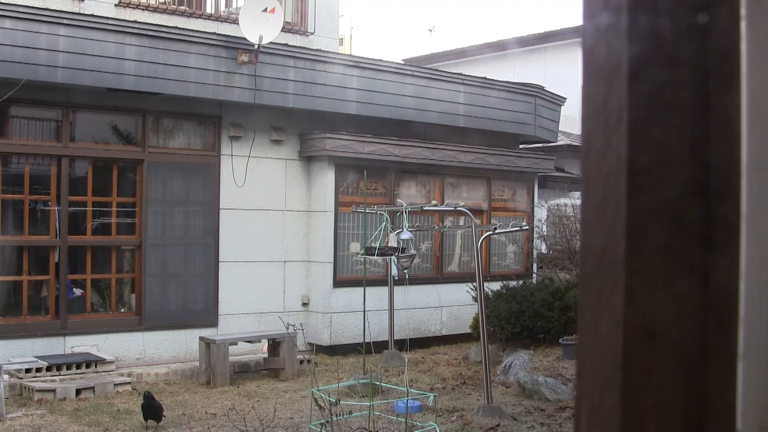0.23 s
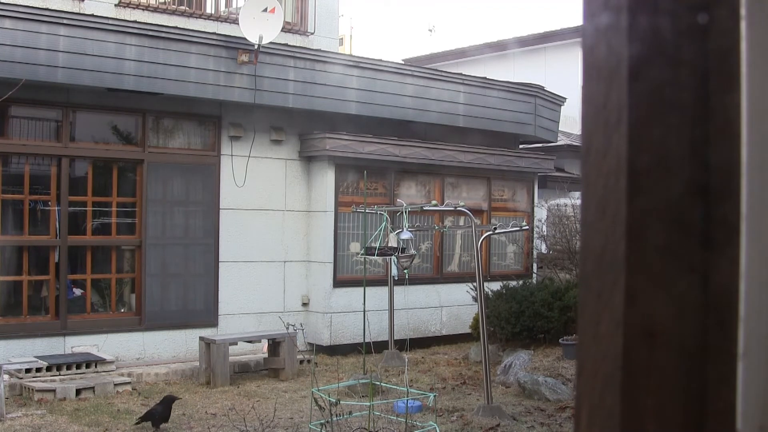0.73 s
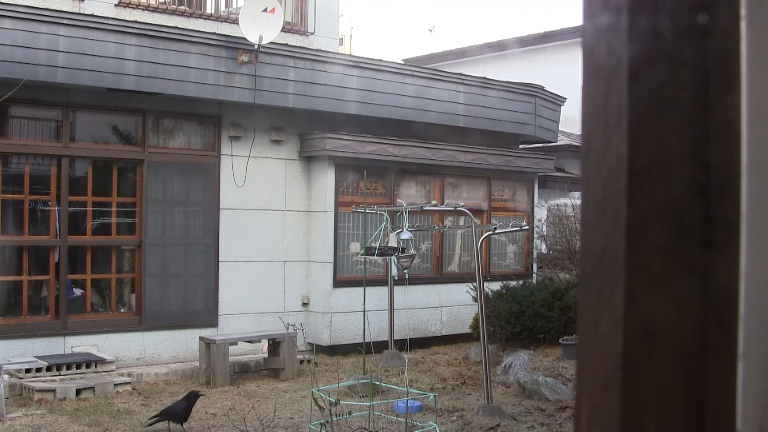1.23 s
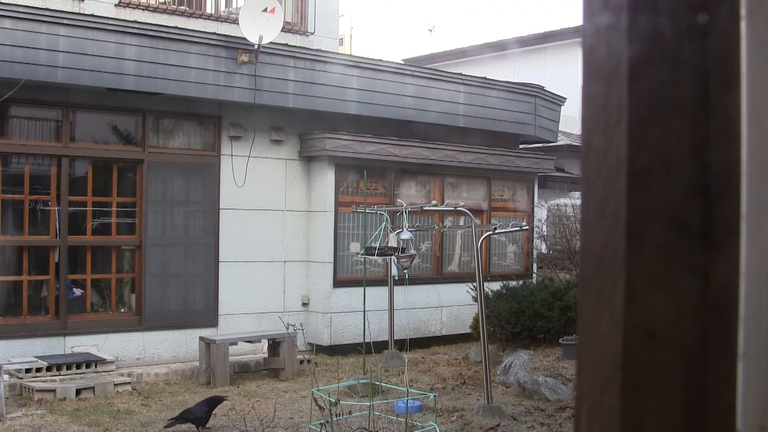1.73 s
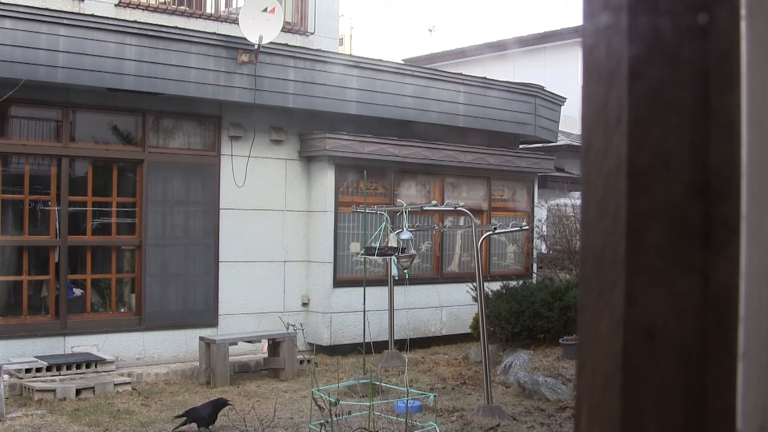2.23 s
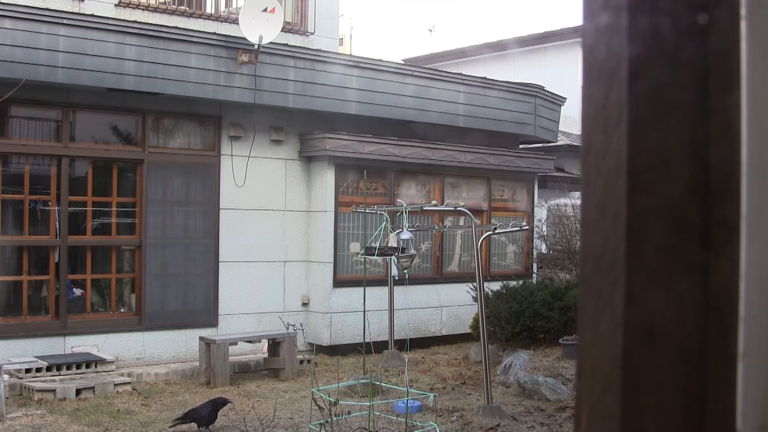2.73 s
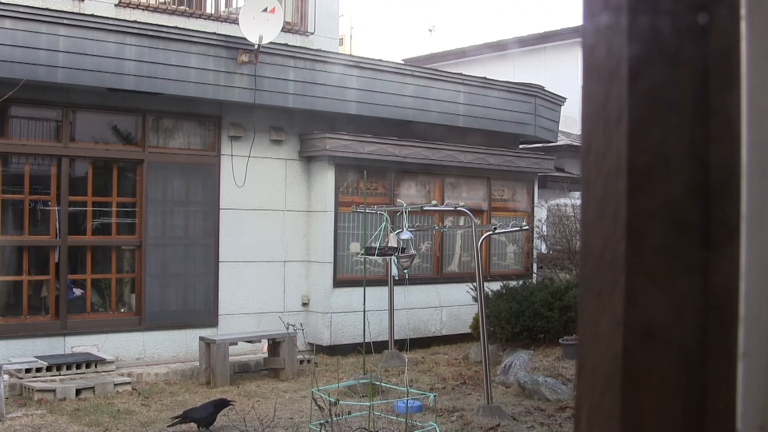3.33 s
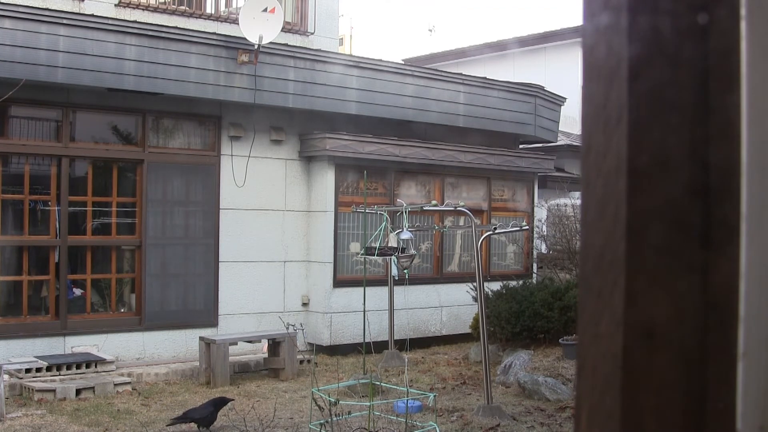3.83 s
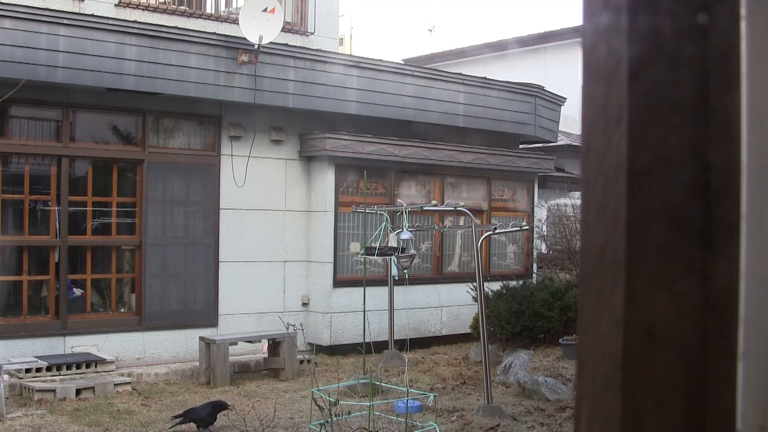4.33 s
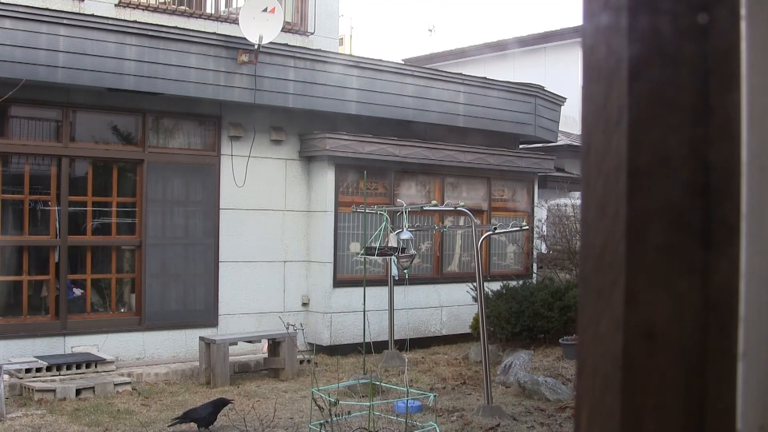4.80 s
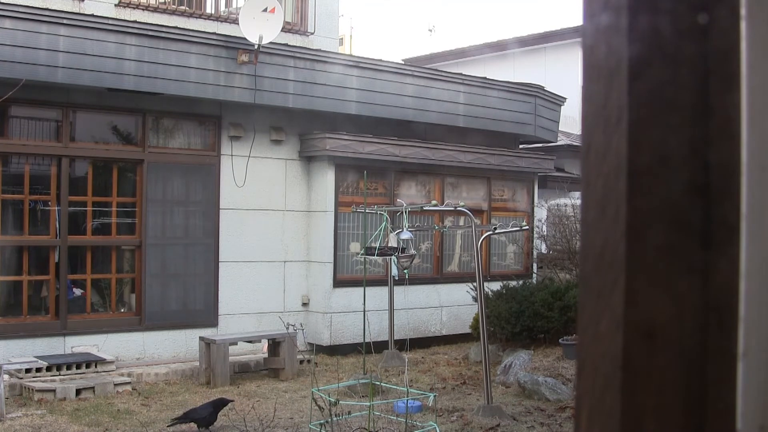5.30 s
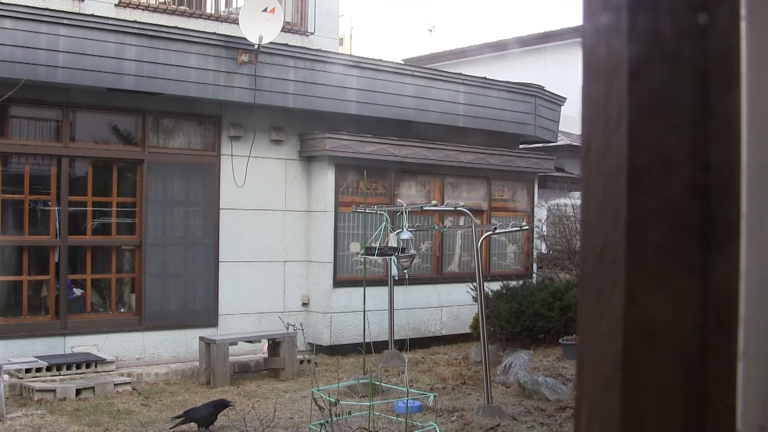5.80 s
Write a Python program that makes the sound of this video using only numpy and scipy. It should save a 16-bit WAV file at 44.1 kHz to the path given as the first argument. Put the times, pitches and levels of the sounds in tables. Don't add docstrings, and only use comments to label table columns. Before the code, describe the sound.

For the first 1.3 seconds there is only a soft, wide town hum with very faint, wavering machine tones. Then a crow, some metres off and slightly left of centre, gives a loud, rattling caw from 1.3 to 1.9 s, starting softly and sinking in pitch. A firmer, less rough one follows at 2.2-2.9 s, a weaker one at 3.2-4.0 s, a longer, smoother one at 4.5-5.2 s, and a short, brighter, raspy one at 5.8-6.2 s. Each opens duller, then turns harsh and nasal, stops quickly and leaves a short echo from the porch and house walls. A far vehicle's low drone grows slowly until about 4.6 s; another rises faster to 5.9 s. Cloth swishes softly near the microphone at 4.2-4.6 s and more faintly at 5.2-5.5 s.

```python
import sys
import numpy as np
from scipy import signal
from scipy.fft import rfft, irfft
from scipy.io import wavfile
from scipy.ndimage import uniform_filter1d

SR = 44100
rng = np.random.default_rng(int(sys.argv[2]) if len(sys.argv) > 2 else 0)


def boost(x):
    u = np.asarray(x, float) / 20
    return 10 ** u


def to_wav(sig):
    pcm = np.clip(np.atleast_2d(sig), -1, 1) * 32767
    pcm = np.round(pcm).astype(np.int16)
    wavfile.write(sys.argv[1], SR, pcm.T)


N = 267113

# (voice starts [s], release starts [s], level [dB], first breath re level [dB], attack [s])
CAWS = [
    (1.305, 1.843, -13.5, -27, 0.09),
    (2.213, 2.83, -13.5, -15, 0.11),
    (3.232, 3.914, -17.5, -24.5, 0.081),
    (4.463, 5.160, -14, -17, 0.068),
    (5.77, 6.151, -15, -15.5, 0.098),
]
# (roughness on a held step [0-1], second membrane [0-1], chest [dB], beak [dB], rasp [dB])
VOICES = [
    (.4, 0.54, -30, -18, -21.5),
    (.3, 0.61, -30.5, -15, -19.5),
    (.4, 0.82, -30, -17.5, -22.5),
    (0.21, 0.68, -30, -17, -20.5),
    (0.29, 0.76, -30, -13, -17.5),
]
BRIGHT_DB = [-0.5, 0, -1.5, -1.5, 1]
# (slip starts [s], length [s], new beat [Hz], roughness added [0-1])
SLIPS = [(1.203, .05, 96.14, 0.03), (1.311, .1, 90.98, 0.08), (1.50, .09, 82.66, 0.36),
         (1.731, .12, 71.87, 0.17), (2.051, .05, 90.3, 0.02), (2.32, .1, 82.77, 0.24),
         (2.76, .06, 75.66, 0.18), (3.052, .05, 98.85, 0.08), (3.239, .21, 81.88, 0.33),
         (3.752, .2, 73.94, 0.15), (4.249, .05, 91.8, 0), (4.58, 0.0575, 89.8, 0), (4.81, .07, 81.83, 0.35),
         (4.963, .18, 74, 0.04), (5.55, .05, 95.6, 0.05), (5.83, 0.065, 89.55, 0.43),
         (5.93, 0.086, 84.44, 0.11)]
# (frequency [Hz], density [dB per Hz])
THROAT = [(200, -27.5), (330, -37), (530, -23), (800, -26.5), (1000, -9.5), (1200, -4.5), (1850, -3),
          (2120, -18.5), (2700, -13.5), (3350, -36.5), (4700, -37), (5700, -32.5), (7800, -47.5),
          (12000, -64.5)]
# (frequency [Hz], width [Hz], boost [dB])
DOORWAY = [(297, 38, 7.5), (548, 18, 11), (885.5, 17, 7.5), (1004, 21, 6.5), (1159.5, 29, 12),
           (1386.4, 47, 7), (1507, 68, 7.5), (1750, 32, 6), (1876, 57, 4), (2239, 110, 6.5)]
# (frequency [Hz], width [Hz], boost [dB])
OPENING = [(2803, 380, 12), (4260, 220, 8.5), (5170, 190, 12.5)]
# (frequency [Hz], width [Hz], boost [dB])
GAPING = [(2585, 205, 10.4), (3750, 90, 7.9), (4110, 170, 4.2), (4400, 87, 4), (5240, 160, 5),
          (5500, 44, 7.1), (6140, 170, 5.6), (6820, 130, 5.7), (8600, 790, 4.2)]
SPLIT_HZ = (790, 2120, 3300)
# (frequency [Hz], t60 [s], level [dB])
YARD = [(500, 0.37, 6), (1570, 0.6, -2), (2660, 0.53, 1), (5960, .45, 6.5)]
# (frequency [Hz], level [dB])
ECHO_SIDE = [(500, -10), (1500, -1), (5000, 3)]
# (frequency [Hz], density [dB per Hz])
CLOTH = [(120, -14), (300, 1), (600, -8.5), (1200, -5), (2500, -10), (5000, -13), (9000, -21.5),
         (13000, -27.5), (15500, -32)]
# (stroke starts [s], fastest [s], ends [s], treble at the fastest [dB])
SWISHES = [
    (4.225, 4.383, 4.6, -57.5),
    (5.212, 5.41, 5.53, -61),
]
# (heard from [s], nearest [s], level there [dB], growth [dB per s])
RUMBLE = [
    (1.988, 4.636, -55.5, 5.5),
    (4.7, 5.856, -53, 13),
]
# (frequency [Hz], density [dB per Hz])
TOWN = [(25, -36), (50, -9.5), (80, -6.5), (180, -1.5), (300, -1), (500, -2), (1000, -7), (1600, -7.5),
        (2800, -14), (5000, -15), (8000, -22.5), (12000, -23.5), (15500, -37)]
# (frequency [Hz], side minus mid [dB])
TOWN_SIDE = [(40, -22.5), (100, -16), (250, -2), (600, -2), (1500, -8), (4000, -3), (14000, -9.5)]
# (frequency [Hz], level [dB])
TONES = [(91.5, -70.5), (183.0, -64.5), (301.5, -65.5), (344.5, -72), (882.9, -70.5), (1012, -67),
         (1254, -70.5), (2062, -76), (2885, -69)]

LEAD_S, LEAD_DB = 0.0074, -20
SAG_FROM, SAG_DB = 0.71, -1.5
RELEASE_S, RELEASE_DB = 0.075, -15
WAVER_DB, WAVER_PER_S = 0.7, 16
GAPE_S = 0.12
TIRES_S, TIRED_SECOND = 0.15, 0.34
CHEST_START_DB, CHEST_START_S, CHEST_END_DB = 14.5, 0.074, 7.5
BEAK_START_DB, BEAK_START_S, BEAK_END_DB = -13.5, 0.029, 3.5
RASP_FALL_DB, RASP_END_DB = -4.5, -1
MOUTH_WAVER_DB = 2
BRIGHT_START_DB, BRIGHT_START_S, BRIGHT_FALL_DB = -7.5, 0.063, -0.5
TILT_HZ = 1460
PORCH_T60_S, PORCH_DB = 0.16, -0.5
YARD_LIKENESS, FIRST_ECHO_S = 0.86, 0.016
CLOTH_DB, SWISH_START_DB, SWISH_END_DB = 16.5, -9, -6.5
RUMBLE_FADE_S = 0.08
TOWN_DB = -50.3


def crow():
    which, since, gone, tired = progress()
    calm, second, chest_db, beak_db, rasp_db = np.array(VOICES)[which].T
    beat_hz, stir = slips()
    rough = np.clip(calm + stir, 0, 1)
    second = np.clip(second * (1 - (1 - TIRED_SECOND) * tired), 0, 1)
    pulses, air = syrinx(beat_hz, rough, second)
    voiced = tract(pulses + 0.8 * rough * air, since)
    breathy = tract(0.23 * pulses + air, since)

    chest_hz, beak_hz, rasp_hz = SPLIT_HZ
    voice = level(band(voiced, chest_hz, beak_hz, order=4), 0)
    chest = level(band(voiced, 200, chest_hz, order=4), 0)
    beak = level(band(voiced, beak_hz, rasp_hz, order=4), 0)
    rasp = level(band(breathy, rasp_hz, 13000, order=4), 0)

    bright_db = np.array(BRIGHT_DB)[which] + BRIGHT_START_DB * np.exp(-since / BRIGHT_START_S)
    voice = tilt(voice, bright_db + BRIGHT_FALL_DB * (gone - .5))
    chest_db = chest_db + CHEST_START_DB * np.exp(-since / CHEST_START_S) + CHEST_END_DB * tired
    beak_db = beak_db + BEAK_START_DB * np.exp(-since / BEAK_START_S) + BEAK_END_DB * tired
    beak_db = beak_db + MOUTH_WAVER_DB * walk(18)
    rasp_db = rasp_db + RASP_FALL_DB * (gone - .5) + RASP_END_DB * tired
    mixed = voice + boost(chest_db) * chest + boost(beak_db) * beak + boost(rasp_db) * rasp
    return effort() * boost(-4.0) * mixed


def syrinx(beat_hz, rough, second):
    beat = np.cumsum(beat_hz * (1 + 0.01193 * rough * walk(60))) / SR
    left = 4 * beat + 0.11 * rough * walk(300)
    right = 5 * beat + 0.092 * rough * walk(300) + 0.32 * rough * walk(25)
    a, b = 2 * np.pi * left, 2 * np.pi * right
    low_strength = (1 + 0.66 * second * np.cos(b)) * boost(4.25 * rough * walk(350))
    high_strength = 0.7 * second * (1 + 0.27 * np.cos(a)) * boost(2.6 * rough * walk(350))
    low = closures(left + 0.089 * second * np.sin(b), low_strength)
    high = closures(right + 0.067 * np.sin(a), high_strength)
    air = rng.standard_normal(N) * (1.3 + np.cos(a)) * (1.5 + second * np.cos(b))
    return level(low + high, 0), level(air, 0)


def closures(turns, strength):
    at = np.flatnonzero(np.diff(np.floor(np.maximum.accumulate(turns))) > 0)
    part = np.clip((np.ceil(turns[at]) - turns[at]) / (turns[at + 1] - turns[at] + 1e-9), 0, 1)
    out = np.zeros(N)
    out[at] += strength[at] * (1 - part)
    out[at + 1] += strength[at] * part
    return out


def slips():
    at, length, hz, extra = np.array(SLIPS).T
    times = np.c_[at, at + length].ravel()
    before = np.r_[hz[0], hz[:-1]]
    beat_hz = ramp(times, np.c_[before, hz].ravel())
    stir = sum(ramp([a - l / 2, a + l / 2, a + 1.59 * l], [0, e, 0]) for a, l, e in zip(at, length, extra))
    return beat_hz, stir


def tract(x, since):
    shut = np.exp(-(since / GAPE_S) ** 2)
    opening = colour(x, THROAT, DOORWAY + OPENING)
    gaping = colour(x, THROAT, DOORWAY + GAPING)
    return shut * opening + (1 - shut) * gaping


def tilt(x, bright_db):
    lowpass = signal.butter(1, TILT_HZ, fs=SR, output="sos")
    lower = signal.sosfilt(lowpass, x)
    lower = signal.sosfilt(lowpass, lower[::-1])[::-1]
    return boost(-bright_db) * lower + boost(bright_db) * (x - lower)


def progress():
    t, rows = np.arange(N) / SR, np.array(CAWS)
    which = np.clip(np.searchsorted(rows[:, 0] - .1, t) - 1, 0, None)
    start, end = rows[which, 0], rows[which, 1]
    gone = np.clip((t - start) / (end - start), 0, 1)
    tired = np.clip(1 + (t - end) / TIRES_S, 0, 1)
    return which, np.maximum(t - start, 0), gone, tired


def effort():
    total = 0
    for start, end, db, first, attack in CAWS:
        sag = start + SAG_FROM * (end - start)
        times = [start - LEAD_S, start, start + attack, sag, end, end + RELEASE_S]
        levels = [first + LEAD_DB, first, 0, 0, SAG_DB, SAG_DB + RELEASE_DB]
        total = total + boost(db + ramp(times, levels, silent=-200))
    return uniform_filter1d(total, size=60) * boost(WAVER_DB * walk(WAVER_PER_S))


def porch(x):
    t = np.arange(SR // 4) / SR
    mid, side = rng.standard_normal((2, len(t))) * np.exp(-np.log(1000) * t / PORCH_T60_S)
    echoes = spread(mid, boost(-10.5) * colour(side, ECHO_SIDE)) / np.sqrt(np.sum(mid ** 2))
    return signal.fftconvolve(x[None], boost(PORCH_DB) * echoes, axes=1)[:, :N]


def yard(x):
    t = np.arange(SR) / SR
    shared, own = rng.standard_normal((2, SR))
    opposite = colour(own, ECHO_SIDE) * np.array([[1], [-1]])
    noise = np.sqrt(1 + YARD_LIKENESS) * shared + np.sqrt(1 - YARD_LIKENESS) * opposite
    edges = [100] + [np.sqrt(a[0] * b[0]) for a, b in zip(YARD, YARD[1:])] + [14000]
    tail = 0
    for (_, t60, db), lo, hi in zip(YARD, edges, edges[1:]):
        fade = np.exp(-np.log(1000) * t / t60) * np.clip(t / FIRST_ECHO_S - .5, 0, 1)
        tail = tail + boost(db) * band(noise, lo, hi) * fade / np.sqrt(2 * np.sum(fade ** 2))
    return signal.fftconvolve(x[None], tail, axes=1)[:, :N]


def cloth():
    mid, side = (level(colour(x * boost(1.2 * walk(90)), CLOTH), 0) for x in rng.standard_normal((2, N)))
    stroke = 0
    for start, top, end, db in SWISHES:
        shape = ramp([start, top, end], [SWISH_START_DB, 0, SWISH_END_DB], silent=-200)
        stroke = stroke + boost(db + shape)
    return boost(CLOTH_DB) * uniform_filter1d(stroke, size=2000) * spread(mid, boost(-10.0) * side)


def rumble():
    mid, side = (level(x, 0) for x in band(rng.standard_normal((2, N)), 81, 430, order=3))
    near = 0
    for start, top, db, grow in RUMBLE:
        levels = [db - grow * (top - start), db, db - 7]
        near = near + boost(ramp([start, top, top + RUMBLE_FADE_S], levels, silent=-200))
    return near * boost(2 + 3.7 * walk(10)) * spread(mid, boost(-16.5) * side)


def town():
    hum, swell = 0, walk(0.27)
    for hz in 24 * 2 ** np.arange(0, 9.6, .5):
        mid, side = band(rng.standard_normal((2, N)), hz / 2 ** .25, hz * 2 ** .25, order=1)
        db = on_log(TOWN, hz) + .5 * swell + .8 * walk(5.6)
        hum = hum + boost(db) * spread(mid, side * boost(on_log(TOWN_SIDE, hz)))
    t, tones = np.arange(N) / SR, 0
    for hz, db in TONES:
        loudness = boost(db + 2.5 + 2.0 * walk(3.18))
        tones = tones + loudness * np.sin(2 * np.pi * hz * t + 1.0 * walk(14))
    return level(hum, TOWN_DB) + tones


def level(x, db):
    return x * boost(db) / np.sqrt(np.mean(x ** 2))


def on_log(table, hz):
    rows = np.array(table)
    return np.interp(np.log(np.maximum(hz, 1)), np.log(rows[:, 0]), rows[:, 1])


def colour(x, table, peaks=(), size=8192):
    hz = np.arange(size // 2 + 1) * SR / size
    db = on_log(table, hz) + sum(g / (1 + (2 * (hz - f) / w) ** 2) for f, w, g in peaks)
    cep = irfft(np.log(boost(db)))
    cep[1:size // 2] *= 2
    cep[size // 2 + 1:] = 0
    return signal.fftconvolve(x, irfft(np.exp(rfft(cep))))[:len(x)]


def band(x, lo_hz, hi_hz, order=2):
    sos = signal.butter(order, [lo_hz, min(hi_hz, .45 * SR)], "band", fs=SR, output="sos")
    return signal.sosfilt(sos, x)


def walk(rate):
    k = int(SR / rate)
    held = np.repeat(rng.standard_normal(N // k + 1), k)
    return 1.306 * uniform_filter1d(uniform_filter1d(held, k), k)[:N]


def ramp(points_s, values, silent=None):
    return np.interp(np.arange(N) / SR, points_s, values, left=silent, right=silent)


def spread(mid, side):
    return np.array([mid + side, mid - side])


def scene():
    bird = crow()
    direct = bird * boost(np.array([[.2], [-.2]]))
    return direct + porch(bird) + yard(bird) + town() + rumble() + cloth()


def top_cut(x):
    return signal.sosfilt(signal.butter(12, 15790, fs=SR, output="sos"), x)


def record(dry):
    rounded = .95 * np.tanh(dry / .95)
    return top_cut(rounded)


dry = scene()
out = record(dry)
to_wav(out)
```